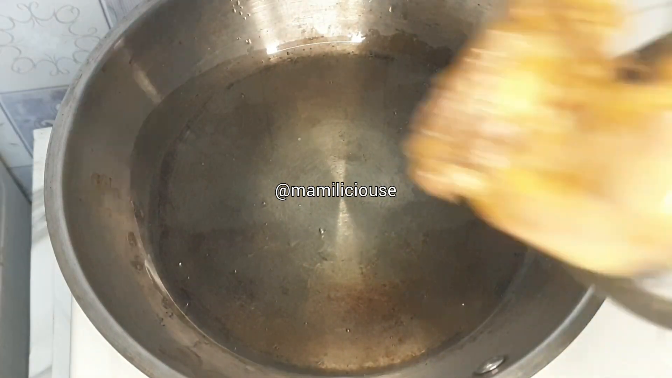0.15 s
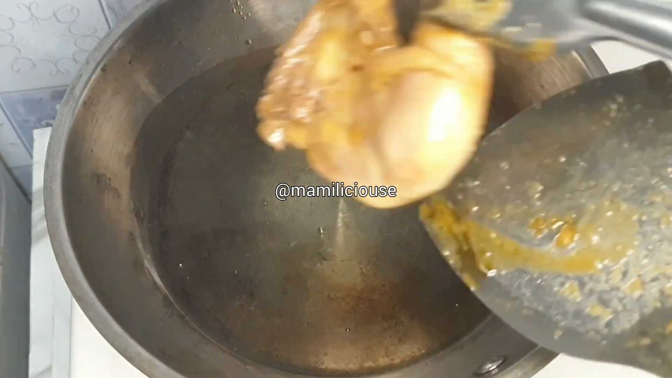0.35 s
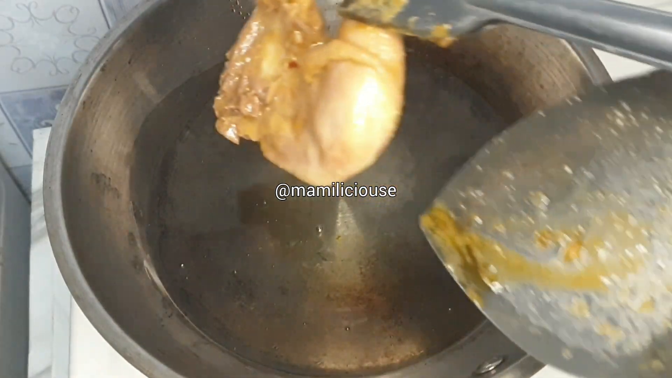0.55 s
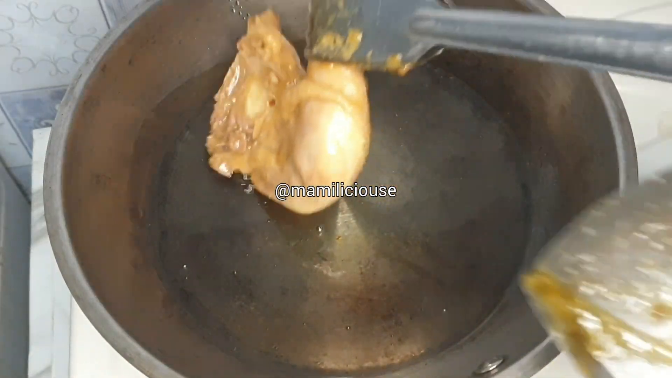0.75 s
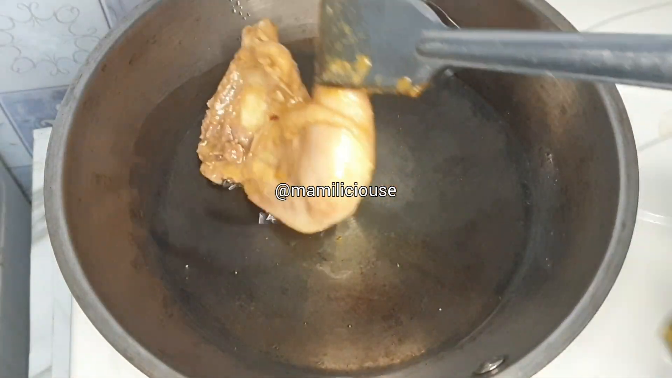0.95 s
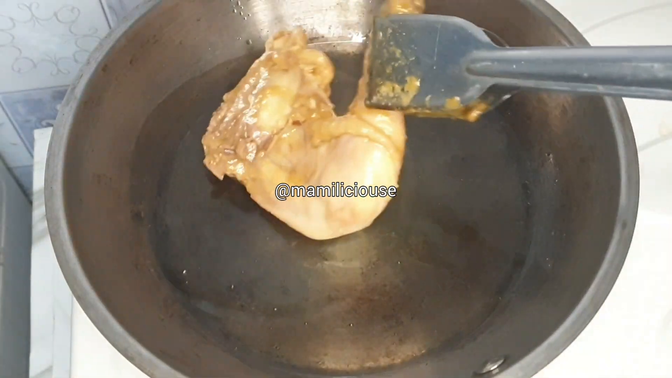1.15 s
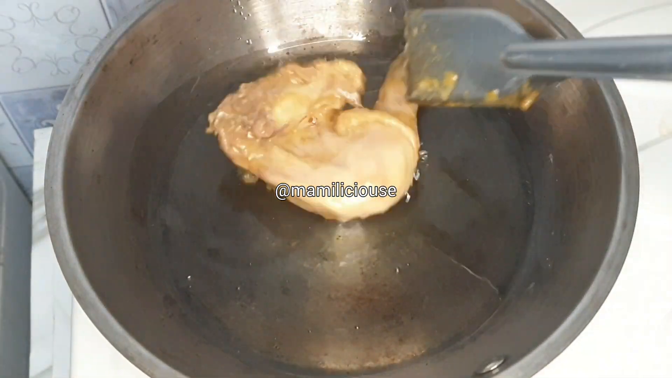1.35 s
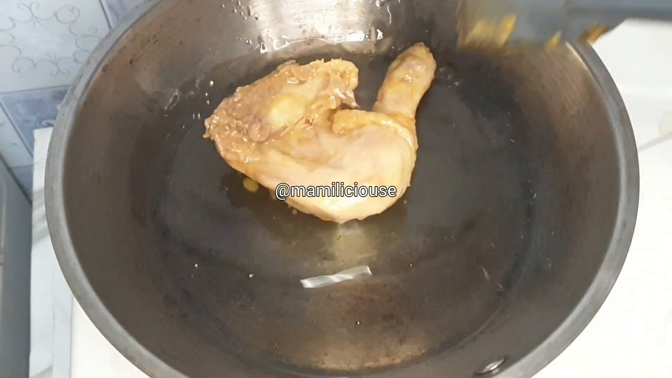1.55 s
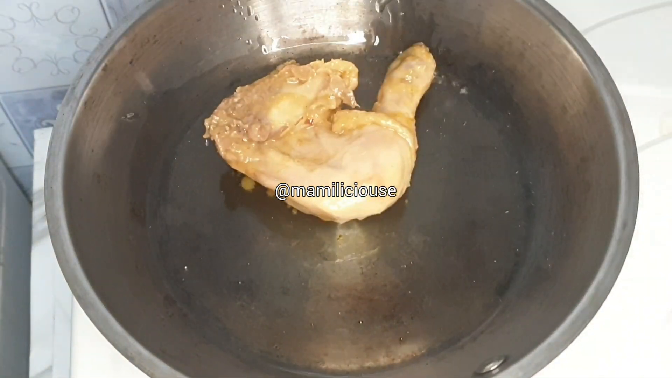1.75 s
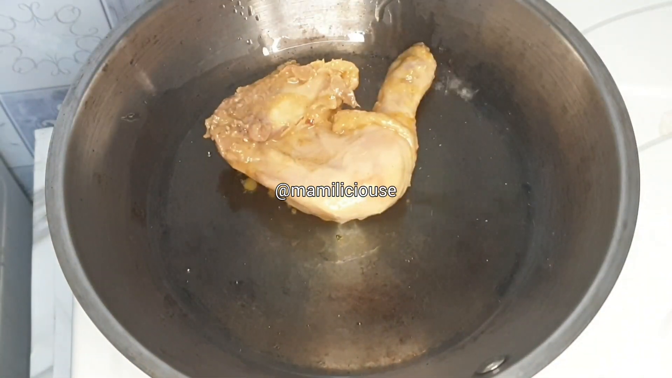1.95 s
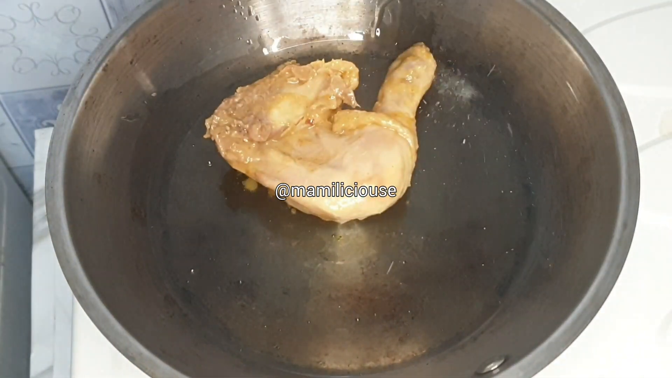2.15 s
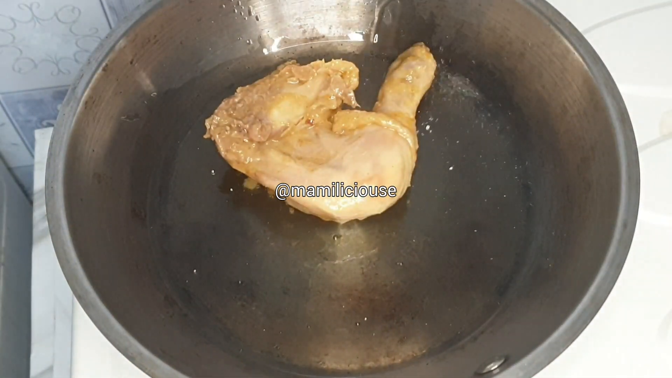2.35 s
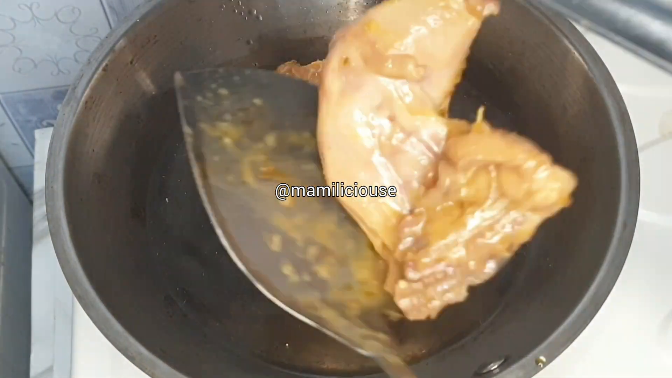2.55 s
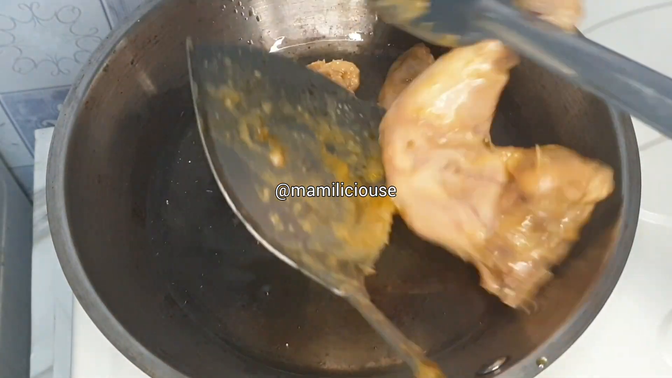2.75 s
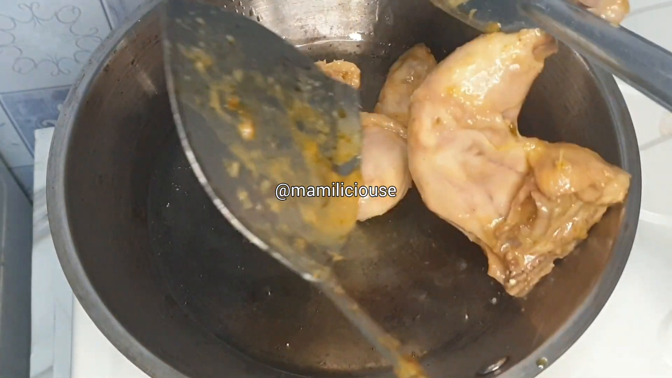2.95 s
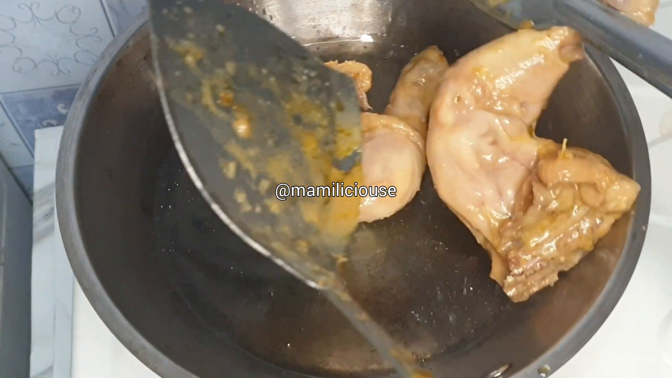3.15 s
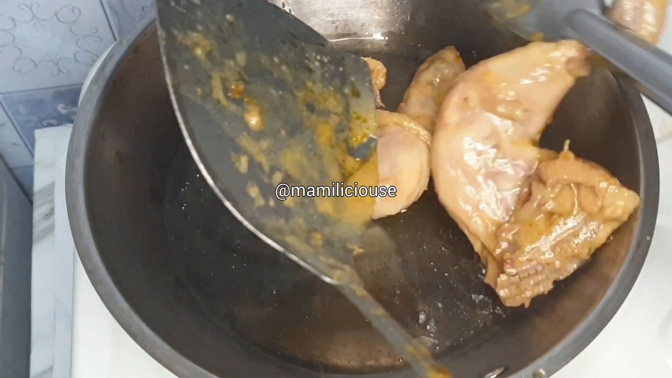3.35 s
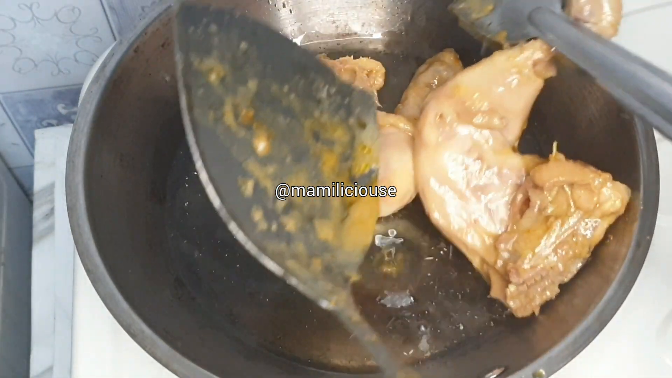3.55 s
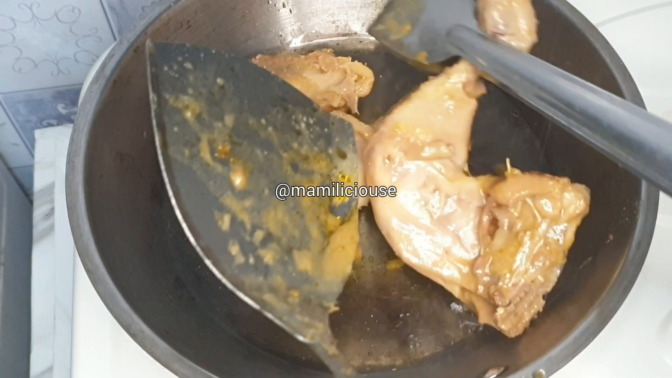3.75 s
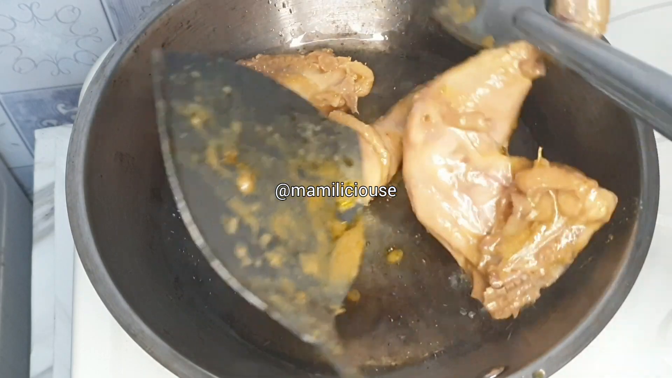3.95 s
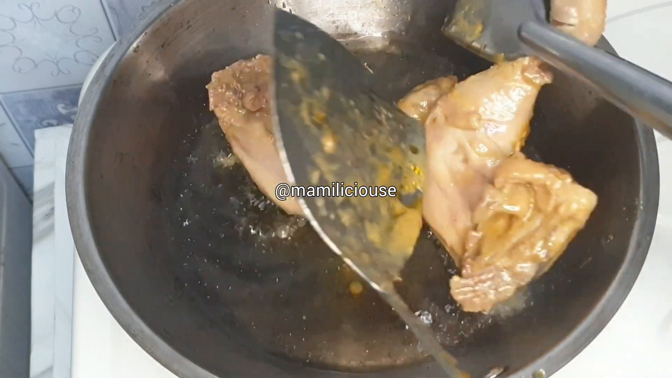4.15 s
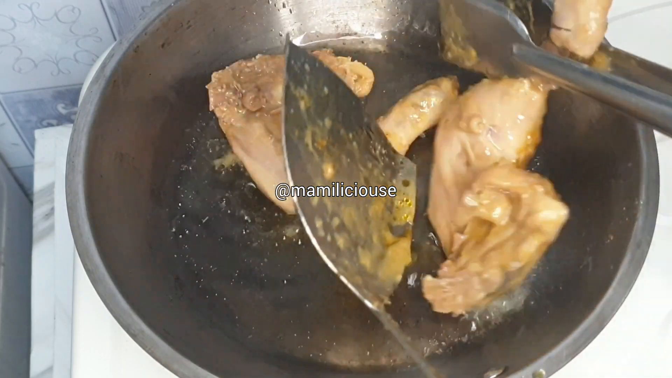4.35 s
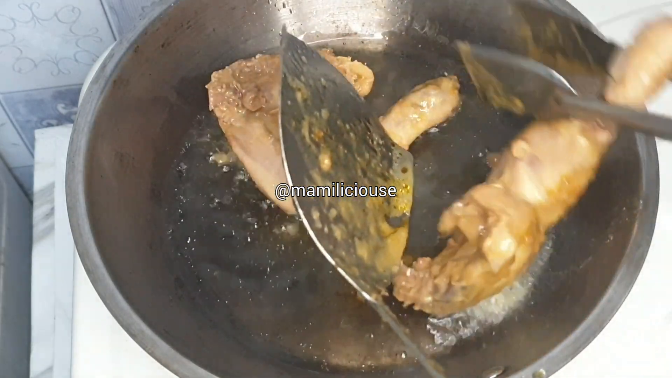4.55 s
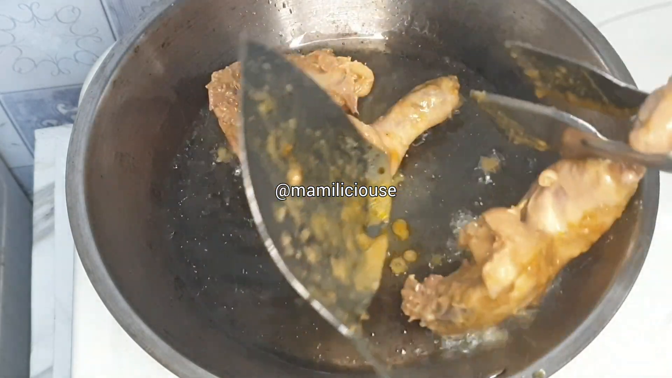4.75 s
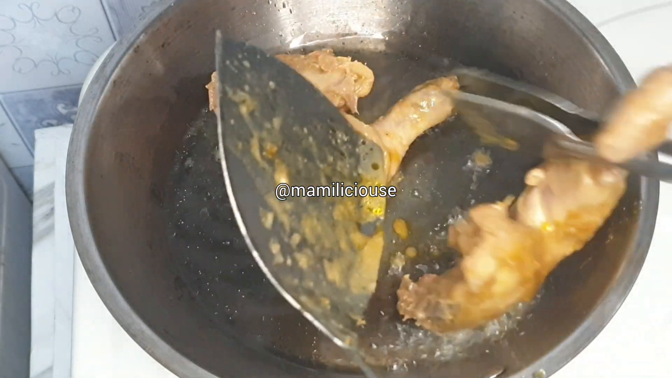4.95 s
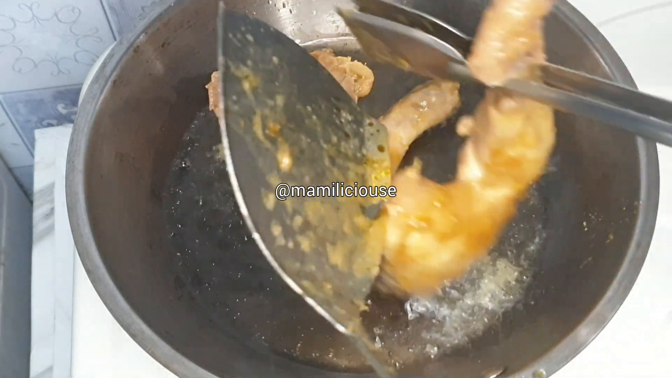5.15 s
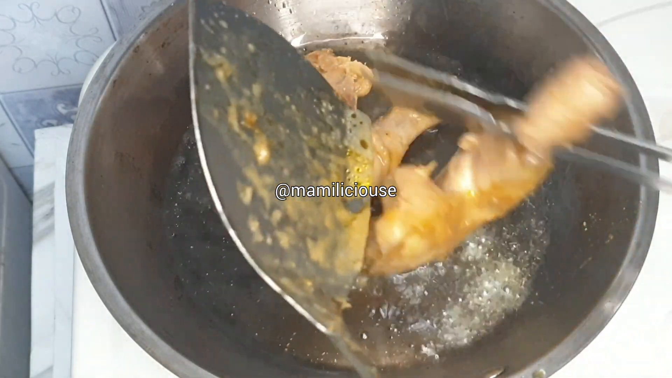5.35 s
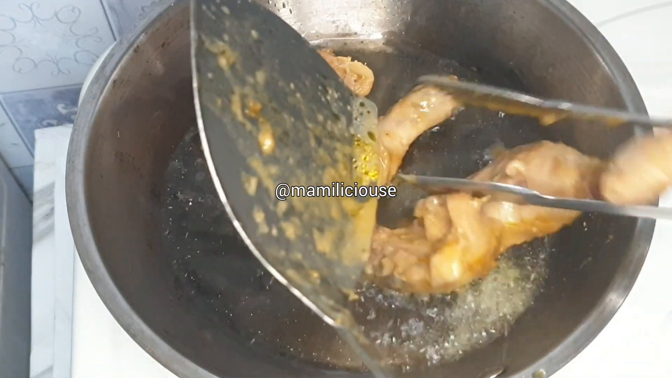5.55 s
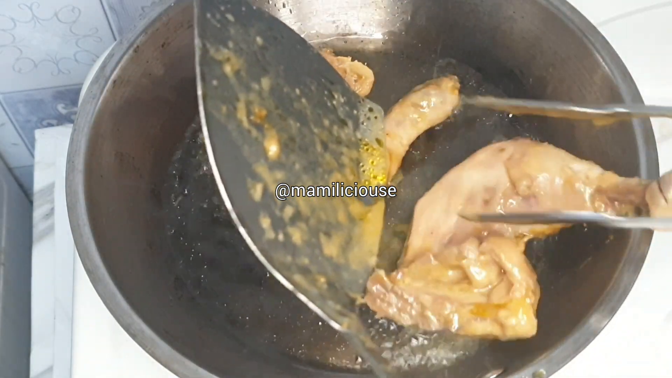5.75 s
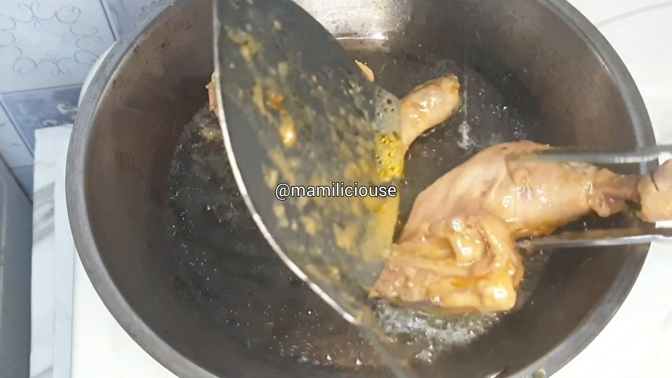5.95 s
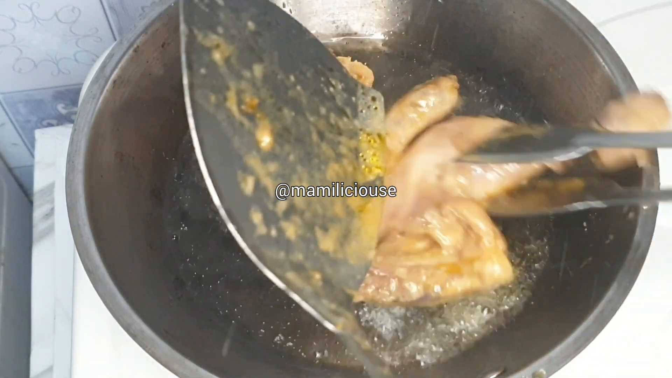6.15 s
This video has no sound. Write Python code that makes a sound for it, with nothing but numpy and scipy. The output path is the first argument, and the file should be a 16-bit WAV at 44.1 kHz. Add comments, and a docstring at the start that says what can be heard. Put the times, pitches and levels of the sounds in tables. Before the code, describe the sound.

A metal tick and a short steel scrape, then violent oil crackle with sharp pops, a tiny gap, and gentler, steadily growing frying.

```python
"""A spitting sizzle: chicken legs are lowered into hot oil, where steam bubbles of all sizes burst and ring.
After a short silence a second, calmer sizzle swells slowly. Both are crackle, droplet clicks and hiss.
Single larger bubbles pop on top. Tongs tick once and a turner scrapes, ringing the modes of the steel.
Dull bumps of the pot are low damped rings. A gas burner's roar and faint room hiss are coloured noise."""
import sys
import numpy as np
from scipy import signal
from scipy.fft import rfft, irfft, next_fast_len
from scipy.io import wavfile
from scipy.ndimage import uniform_filter1d

SR = 44100
rng = np.random.default_rng(int(sys.argv[2]) if len(sys.argv) > 2 else 0)


def master(y):
    """Save y as 16-bit WAV."""
    cut = np.clip(np.atleast_2d(y).T, -1, 1)
    pcm = np.round(cut * 32767)  # scale
    wavfile.write(sys.argv[1], SR, pcm.astype(np.int16))


def field_ratio(decibels):
    """Amplitude ratio for a level in dB (20 dB per decade); scalars and array-likes work."""
    return 10 ** (np.asarray(decibels, dtype=float) / 20)


N = 272979  # samples

SILENCE_S = 2.5065, 2.517  # the gap between the two pieces: start, end
LEFT_LEAD = 2  # samples, the pot sits nearer the left microphone


def evened(x):
    """Scales to rms 1."""
    return x / np.sqrt(np.mean(x ** 2) + 1e-20)


def read(points, hz):
    """Reads a curve of (Hz, value) points on a log-frequency axis."""
    f, value = np.transpose(points)
    return np.interp(np.log(hz + 1), np.log(f + 1), value)


def curve(rows):
    """Columns of a time table at every sample."""
    s, *columns = np.transpose(rows)
    t = np.arange(N) / SR
    return [np.interp(t, s, column) for column in columns]


def drift(per_s):
    """Slow random wander, drawn through per_s chance values a second."""
    knots = rng.standard_normal(int(N / SR * per_s) + 3)
    return np.interp(np.arange(N) / SR * per_s, np.arange(len(knots)), knots)


def shaped(x, gain):
    """Multiplies the spectrum by gain(hz)."""
    size = next_fast_len(N)
    return irfft(rfft(x, size) * gain(np.fft.rfftfreq(size, 1 / SR)), size)[..., :N]


def add(mix, s, sound, pan_db=2.):
    """Places a sound between the two microphones; the nearer one hears it louder and sooner."""
    for side, lean_db in zip(mix, (pan_db / 2, -pan_db / 2)):
        part = side[round(s * SR - lean_db):][:len(sound)]  # one sample sooner per dB louder
        part += field_ratio(lean_db) * sound[:len(part)]


# How alike left and right are. Each row: frequency in Hz, likeness from 0 to 1.
LIKENESS = [(25, .5), (60, 0.94), (150, 0.93), (400, 0.72), (1000, 0.46), (3000, 0.15), (6000, 0.22),
            (15000, 0.048)]


def paired(x):
    """Two microphones agree in the bass and part in the treble."""
    def same(hz):
        return np.clip(read(LIKENESS, hz), 0, 1)

    shared = shaped(np.roll(x[0], LEFT_LEAD), same)
    own = shaped(x[1], lambda hz: np.sqrt(1 - same(hz) ** 2))
    return np.array([x[0], shared + own])


def stereo_noise():
    """White noise heard by the two microphones."""
    return paired(rng.standard_normal((2, N)))


def echoes(x, t60, start_s):
    """Sparse fading reflections of random sign, other ones for each microphone; t60 in seconds."""
    taps = np.zeros((2, 8000))
    at = np.arange(0, 7980, 20) + rng.integers(0, 20, (2, 399))
    np.put_along_axis(taps, at, rng.choice([-1., 1.], at.shape), 1)
    t = np.arange(8000) / SR
    taps *= field_ratio(-60 * t / t60) * (t > start_s)
    return signal.oaconvolve(x, taps / np.linalg.norm(taps[0]), axes=1)[:, :N]


# Colour of the room hiss. Each row: frequency in Hz, relative level in dB per Hz.
AIR_COLOUR = [(880, -25), (1500, -7.0), (2670, -7.5), (5090, -11.0), (7520, -10.0), (8290, -19),
              (11400, -12), (15500, -11), (17000, -2)]


def air():
    """Faint steady hiss of the room: coloured noise."""
    hiss = evened(shaped(stereo_noise(), lambda hz: field_ratio(read(AIR_COLOUR, hz))))
    return field_ratio(-67.5) * hiss


# Colour of the flame and kitchen air. Each row: frequency in Hz, relative level in dB per Hz.
ROAR_COLOUR = [(15, -54), (25, -21.0), (93, -0.5), (152, -10.0), (297, -17.5), (359, -22.0), (495, -25.5),
               (567, -27), (684, -28.5), (1140, -37.0), (1380, -35.5), (3630, -54), (5140, -42),
               (8350, -67), (15500, -58), (17000, -60)]
# Fuzzy tones in the roar. Each row: frequency in Hz, width in Hz, height above the roar in dB.
DRONES = [(87.5, 3.1, 7), (299.5, 15, 5.5), (950, 120, 7), (1370, 50, 7), (2168, 60, 16.5)]


def burner():
    """Flame roar: low noise with faint drones and a lumpy flutter; from about 2 s the roar drops to a quieter
    steady level."""
    level_db, sink_from_s, sink_db, sink_time_s = -48, 1.99, -16., 0.77

    def colour(hz):
        drones_db = sum(db / (1 + (2 * (hz - f) / width) ** 2) for f, width, db in DRONES)
        return field_ratio(read(ROAR_COLOUR, hz) + drones_db)

    smooth = uniform_filter1d(uniform_filter1d(rng.standard_normal(N), 2000), 2000)
    flutter_db = evened(smooth)
    roar = evened(shaped(stereo_noise(), colour))
    since_s = np.maximum(np.arange(N) / SR - sink_from_s, 0)
    sinking_db = sink_db * (1 - np.exp(-since_s / sink_time_s))
    return roar * field_ratio(level_db + sinking_db + flutter_db) * field_ratio([[1.2], [-1.2]])  # leans left


# Dull bumps through pot and worktop. Each row: start in seconds, level in dB, pitch in Hz,
# spread of the pitch in Hz, time to fade by 60 dB in seconds.
BUMPS = [(0.08, -24.5, 52.6, 23, 0.18), (0.131, -34, 643, 1000, 0.016), (0.428, -33.5, 92, 23, 0.24),
         (1.386, -39.5, 335, 120, 0.36), (1.425, -24, 60.3, 26, 0.16), (2.772, -47.5, 330, 190, 0.45),
         (2.78, -45, 87.2, 69, 0.58), (3.104, -38, 123, 100, 0.11), (3.391, -44.5, 423, 380, 0.32),
         (3.42, -43.5, 100, 64, 0.4), (5.685, -40.5, 396.4, 180, 0.39), (5.697, -37.5, 83.4, 38, 0.32),
         (5.7, -45, 234, 140, 0.21), (5.719, -41, 153, 11, 0.52)]


def bumps():
    """Soft blows: a damped ring smeared over a band by rattling."""
    out, t = np.zeros((2, N)), np.arange(SR // 2) / SR
    for s, db, hz, spread_hz, t60 in BUMPS:
        a, b = rng.standard_normal((2, len(t)))
        r = np.exp(-np.pi * spread_hz / SR)
        rattle = signal.lfilter([1], [1, -2 * r, r * r], a + 1j * b)
        # only the phase of the rattle is used, so the fade stays smooth
        ring = (np.exp(2j * np.pi * hz * t) * rattle / abs(rattle)).imag
        soft_start = 1 - np.exp(-t * hz / 2.2)
        add(out, s, ring * field_ratio(db - 60 * t / t60) * soft_start, 2.5)
    return out


# Thin ringing modes of the tongs. Each row: frequency in Hz, relative level in dB,
# time to fade by 60 dB in seconds.
TONG_MODES = [(4240, -12, 0.65), (4380, -22, .3), (4624, -20, 0.65), (4700, -10, 0.43), (5220, -4, 0.16),
              (5350, -10, 0.18), (5830, 7, 0.15), (6200, -13.5, 0.25), (6450, -12, .3), (6870, -12, 0.21),
              (7110, -4, .25), (7634, 3, 0.13)]
# Colour of the tongs' dense ring. Each row: frequency in Hz, relative level in dB per Hz.
SHIMMER = [(880, -73), (1500, -40), (4020, -17), (4180, -15), (4990, -8), (5890, -4), (7020, 0.5),
           (7520, -19), (11100, -25), (13300, -15), (15500, -38), (17000, -18)]


def ticks():
    """Tongs tap steel once: a crack, a dense bright shimmer and thin modes."""
    s, db = 0.418, -29  # start in seconds, level that the parts below are set against
    dense, thin, t = np.zeros((2, N)), np.zeros((2, N)), np.arange(SR // 2) / SR
    ring = sum(field_ratio(d - 60 * t / t60) * np.sin(2 * np.pi * (hz * t + rng.random()))
               for hz, d, t60 in TONG_MODES)
    add(thin, s, field_ratio(db - 5.5) * ring / abs(ring).max(), 0.)
    noise = rng.standard_normal(len(t))
    crack, tail = field_ratio(10.5 - 60 * t / 0.013), field_ratio(-2.0 - 60 * t / 0.11)
    add(dense, s, field_ratio(db) * noise * (crack + tail), 0.)
    add(thin, s, field_ratio(db - 23.0 - 60 * t / 0.0055) * noise, 0.)  # the contact itself is wide
    dense = shaped(dense, lambda hz: field_ratio(read(SHIMMER, hz)))
    dense *= np.arange(N) >= s * SR  # nothing sounds before the tap
    return thin + dense + field_ratio(2.0) * echoes(dense, 0.3, 0.0023)


# Blade strokes on steel. Each row: start in seconds, relative level in dB, fade in dB per second,
# edge bite in dB added to the modes over 2 kHz.
STROKES = [(0.792, -38.5, 123, 1), (0.95, -43.5, 86, 2), (1.03, -43.5, 61, 4), (1.085, -43.5, 110, 3),
           (1.257, -47.5, 300, 2), (1.305, -49, 400, 4), (1.349, -46, 404, 4.5)]
# Ringing modes of the pot. Each row: frequency in Hz, width in Hz, relative level in dB.
POT_MODES = [(493, 30, -8.5), (802, 17, -6), (945, 38, -2.5), (1118, 34, -10.5), (1443, 37, -1),
             (1650, 21, -8), (2245, 25, -6), (2550, 49, -3), (2870, 50, -15), (3470, 38, -8),
             (4030, 46, -9), (4300, 55, -11), (4820, 65, 4), (6100, 74, -14), (6470, 73, -15),
             (7500, 76, -11)]


def scrape():
    """Stick-slip clicks under the blade ring the pot wall; each mode comes and goes as the blade moves."""
    slips_per_s, rise_s, lift_s = 1800, 0.017, 1.4  # the blade lifts off at lift_s
    t = np.arange(N) / SR
    strokes = np.array([np.clip((t - s) / rise_s, 0, 1) * field_ratio(db - fade * np.maximum(t - s, 0))
                        for s, db, fade, _ in STROKES])
    bite_db = np.array(STROKES)[strokes.argmax(0), -1]  # the loudest stroke decides
    clicks = (rng.random((2, N)) < slips_per_s / SR) * rng.standard_normal((2, N))
    slips = clicks * np.sqrt(SR / slips_per_s) * strokes.max(0) * (t < lift_s)
    span = 2 * SR  # covers all strokes and their ringing
    slips, out, t = slips[:, :span], np.zeros((2, N)), t[:4000]
    for hz, width, db in POT_MODES:
        ring = np.exp(-np.pi * width * t) * np.sin(2 * np.pi * hz * t)
        mode = field_ratio(db) * ring * np.sqrt(4 * np.pi * width / SR)
        drive = slips * field_ratio(4.5 * drift(25.) - 2. + bite_db * (hz > 2000))[:span]
        out[:, :span] += signal.oaconvolve(drive, mode[None], axes=1)[:, :span]
    out = shaped(out, lambda hz: 1 - 1 / (1 + (hz / 600) ** 4))  # the thick wall radiates little bass
    return paired(field_ratio(6.0) * out) * field_ratio([[1.2], [-1.2]])


# Vigour of the boiling, one list for each piece. Each row: time in seconds, sizzle level in dB.
FRYING = [
    [(0.78, -59), (0.797, -27.5), (0.87, -35.5), (0.94, -36.5), (0.96, -32.5), (1.1, -34.5), (1.17, -38.5),
     (1.38, -41.5), (1.392, -32.5), (1.45, -29), (1.5, -26), (1.56, -24), (1.635, -26.5), (1.86, -27),
     (1.935, -29), (2.02, -20), (2.18, -25.5), (2.32, -26.5), (2.39, -29), (2.506, -28)],
    [(2.517, -38.5), (2.6, -41), (2.77, -39), (3.025, -33), (3.15, -36), (3.4, -36.5), (3.65, -34.5),
     (3.775, -34.5), (4.05, -33), (4.3, -34), (4.525, -32), (5.025, -33.5), (5.275, -32.5), (6.19, -30)],
]


def vigour():
    """Sizzle level in dB at every sample."""
    return curve(FRYING[0] + FRYING[1])[0]


def lesser_pops(count=90):
    """Random pops of a dull and a bright family, riding on the sizzle level."""
    families_hz = (2300, 5120), (10000, 11000)  # lowest and highest pitch of each
    at, size, pitch, family, side = rng.random((count, 5)).T
    start_s = FRYING[0][1][0]
    s = start_s + at * (N / SR - start_s - .02)
    low, high = np.transpose(families_hz)[:, (family > .5).astype(int)]
    db = vigour()[(s * SR).astype(int)] + 4 + 3 * (2 * size - 1)  # 1 to 7 dB over the sizzle level
    pan_db = 4 + 5 * (4 * side - 2)
    return list(zip(s, db, low * (high / low) ** pitch, pan_db))


def bubble(hz, cycles, glide):
    """A burst cavity: quick rise, damped ring, pitch climbing as it opens."""
    u = np.arange(int(3 * cycles * SR / hz) + 8) * hz / SR  # time in cycles
    ring = np.sin(2 * np.pi * (u + glide * u ** 2 / cycles))
    return ring * np.exp(-2.3 * u / cycles) * (1 - np.exp(-1.1 * u))


# The loudest single bubbles. Each row: start in seconds, level in dB, pitch in Hz,
# left over right in dB.
POPS = [(0.9048, -19.5, 7500, -1), (0.9572, -20.5, 3430, 4.5), (1.0859, -17, 4800, 5),
        (1.281, -20, 4780, 10), (1.2864, -22, 4600, 2.5), (1.4646, -24, 2880, -5), (1.4925, -22, 4970, -2),
        (1.6931, -16.5, 4760, 3.0), (1.7689, -16, 3620, 0.5), (1.8432, -11, 6080, 2.5),
        (1.9041, -15.5, 5690, 0), (1.932, -19, 5800, -1.0), (1.9599, -27, 5980, -6), (1.9849, -19, 5230, 1),
        (2.0234, -17.5, 4120, -2), (2.0354, -10.5, 5100, -3.5), (2.0854, -15.5, 4560, 1),
        (2.1111, -14.5, 4980, 0.5), (2.142, -18, 5100, 2), (2.2004, -14, 3840, 2.5),
        (2.2584, -26, 1680, 2.5), (2.2797, -14.5, 3780, -0.5), (2.3186, -13, 5460, 1.5),
        (2.3334, -20.5, 1530, 5), (2.3516, -15, 3540, 3.5), (2.3574, -17, 5000, -0.5),
        (2.388, -15, 5760, -3), (2.3974, -15.5, 5080, -0.5), (2.4324, -31, 5080, -2),
        (2.4488, -12, 4930, 4), (2.4828, -16, 5050, 3.5), (2.5735, -28, 4790, 8),
        (2.6354, -22.5, 3900, 3.5), (2.6768, -21, 1690, -5.5), (2.7314, -23, 5100, 4),
        (2.7494, -26, 2590, -5), (2.7921, -26, 3650, 7), (2.8794, -22, 4600, 6), (3.0001, -23, 5290, 1.5),
        (3.0714, -22.5, 3860, 1.5), (3.1374, -33, 1560, 1.0), (3.2316, -20, 4900, 2),
        (3.2864, -25, 4990, 6.5), (3.3944, -26, 2520, 1), (3.4765, -20, 4270, 5.5),
        (3.4904, -23, 4950, 5.5), (4.1134, -18, 4170, 5.5), (4.5077, -25, 1860, 4),
        (4.6544, -23, 2270, 1.0), (5.2514, -20.5, 3830, 5), (5.7204, -19.5, 2760, 4),
        (5.9065, -20, 4030, 2.5), (6.0467, -21, 3050, 3), (1.2605, -36.5, 950, 4.5),
        (1.3094, -27.5, 2540, 5), (2.0557, -18, 2640, -2), (2.1844, -32, 2720, 10),
        (2.3226, -16.5, 2800, 3.5), (2.4964, -21, 3050, 2), (2.7237, -29, 2600, -5),
        (2.7427, -29, 2550, -3), (2.7614, -38, 2580, 6), (2.9996, -28, 2900, 4), (3.8811, -29, 2250, 7),
        (4.0696, -24, 3020, 7), (4.1679, -23, 3030, 2), (4.4852, -26, 2170, 1), (4.6464, -23, 2400, 4.5),
        (4.7895, -23.5, 2580, 3), (4.8264, -27, 2920, 1.5), (4.9422, -25, 2540, 0), (4.9911, -25, 3080, 3),
        (5.1876, -25, 2600, 11), (5.7389, -26, 3060, 1.5), (5.913, -25, 2970, 2.5),
        (5.9304, -23, 2590, 0.5), (1.1168, -22, 13100, 5), (1.3897, -15.5, 10100, 4),
        (1.4137, -15.5, 10000, -0.5), (1.5728, -8.5, 11400, 3), (1.6581, -21, 9390, -0.5),
        (1.6671, -11.5, 11200, 6), (1.693, -20, 9830, 5.5), (1.8098, -18, 12000, 2.0),
        (1.8676, -10, 11600, 2.5), (1.9604, -14, 11700, 3), (2.0078, -13, 11700, 3),
        (2.0258, -24, 12000, 6), (2.2044, -15, 11300, -4), (2.2393, -14, 11400, 4),
        (2.2742, -18, 12100, 3.5), (2.2932, -21, 11500, 1.0), (2.357, -23, 11600, -5),
        (2.3735, -11.5, 11600, 0), (2.3979, -21, 12200, -6), (2.4109, -10.5, 11600, 2),
        (2.4508, -20.5, 11700, 5), (2.8514, -19, 11700, 5), (3.475, -20, 10600, 2),
        (3.5997, -19, 11400, 6.5), (3.6351, -16, 11300, 6.5), (4.2881, -22, 12100, 10),
        (5.0519, -21, 10400, 1.5), (5.8406, -29, 11700, 4), (5.8591, -19.5, 11600, 7),
        (6.105, -18, 11600, 2.5)]
# How long a bubble rings. Each row: pitch in Hz, cycles until it has faded by about 20 dB.
RING_CYCLES = [(1500, 3), (2500, 3.7), (4800, 12.2), (6500, 4.5), (11500, 6.1)]


def pops():
    """Each large bubble rings at its pitch inside a short wet splash of noise."""
    rings, splashes, n = np.zeros((2, N)), np.zeros((2, N)), np.arange(300)
    swell = n / 20.0 * np.exp(1 - n / 32.2)
    for s, db, hz, pan_db in POPS + lesser_pops():
        ring = bubble(hz, np.clip(read(RING_CYCLES, hz), 1, 40), 0.0046)
        add(rings, s, field_ratio(db) * ring / ring.max(), pan_db)
        splash = rng.standard_normal(300) * swell
        add(splashes, s - .0005, field_ratio(db - 7.0) * splash, pan_db)
    out = rings + shaped(splashes, lambda hz: field_ratio(read(SPITTING_COLOUR, hz)))
    return out + field_ratio(-2.0) * echoes(out, 0.049, .001)


def burst_train(chance, spread_db):
    """Single-sample bursts at random moments, a few much stronger than the rest."""
    return (rng.random(N) < chance) * field_ratio(spread_db * np.minimum(rng.exponential(1, N), 4))


def crackle(per_s, spread_db, patchy_db, count=72):
    """Bubbles of every size burst in clumps; each size swells on its own and has its own side."""
    clumps, out, patch = drift(90.), np.zeros((2, N)), drift(9.)
    for hz in np.geomspace(700, 16500, count):
        cycles, glide, lag, side = rng.random(4)
        grain = bubble(hz, 1.22 + 14 * cycles ** 3 * min(hz / 3500, 6000 / hz, 1), 0.13 * glide)
        patch = .8 * patch + .6 * drift(9.)  # neighbouring sizes swell together
        rate = per_s / count * np.sqrt(hz / 3000) * field_ratio(3. * clumps + patchy_db * patch)
        train = burst_train(rate / SR, spread_db)
        sound = evened(signal.oaconvolve(train, grain)[:N]) * np.sqrt(hz)  # equal power per Hz
        left = sound * field_ratio(8.7 * side - 2.5)
        right = np.roll(sound, LEFT_LEAD + round(9 * lag - 4)) * field_ratio(2.5 - 5.5 * side)
        out += [left, right]
    return evened(out)


def spit(per_s, spread_db):
    """Droplets thrown out of the oil: wide clicks, each a puff of noise fading within a few ms."""
    train = burst_train(per_s / SR, spread_db)
    puff = signal.lfilter([1], [1, -np.exp(-1 / (SR * 0.00057))], train)
    return evened(paired(puff * rng.standard_normal((2, N))))


# Colour of the wetter first piece, also of the pops' splashes.
# Each row: frequency in Hz, relative level in dB per Hz.
SPITTING_COLOUR = [(240, -41), (400, -24), (543, -22.0), (726, -16.0), (1170, -15.5), (1540, -11),
                   (2360, -8.0), (2670, -6.5), (5000, 0), (7550, -4.0), (8400, -12), (11800, -4),
                   (15500, -13.5), (17000, -15.0)]
# Colour of the calm second piece. Each row: frequency in Hz, relative level in dB per Hz.
CALM_COLOUR = [(240, -32), (400, -24), (796, -13.0), (1120, -12.5), (1280, -13.5), (1540, -7), (1930, -7),
               (3010, -2.5), (3360, -3.0), (4220, 1), (6000, -2.0), (7600, -6.0), (8400, -12.0),
               (9500, -6.0), (10600, -6), (11700, -3.0), (13000, -8.5), (15500, -12.5), (17000, -30.0)]
# Sideways lean, one list for the calm and one for the spitting piece.
# Each row: frequency in Hz, left over right in dB.
LEAN = [(60, -7), (180, 7.5), (550, 1), (1650, 2), (4970, 1), (15000, 2.5)], [(60, 4), (180, 12),
        (550, 1.5), (1650, 3.0), (4970, -1), (15000, -2)]
# Spells of thinner or thicker spray. Each row: start in seconds, end in seconds, change in dB.
SPRAY_SPELLS = [(2.514, 2.786, -4.5), (3.56, 3.797, 1.5), (4.667, 5.05, 3)]


def sizzle():
    """Crackle, spit and steam hiss fill the pot; the first piece spits harder than the second."""
    level_db, t = vigour(), np.arange(N) / SR
    first = t < SILENCE_S[0]
    # a surge feeds the middle sizes most: big bubbles and fine spray follow it only in part
    plain_level_db = np.where(first, -29, -34)
    surge_db = np.clip(level_db - plain_level_db, -12, 12)
    # as the second piece heats, big bubbles gain and spray thins
    heating_s = (t - 4.4) * ~first
    big_db = 0.87 * heating_s - 0.4 * surge_db
    fine_db = np.where(first, 4, 0.5) - 1.1 * heating_s - 0.21 * surge_db
    fine_db = fine_db + sum(db * (t > start) * (t < end) for start, end, db in SPRAY_SPELLS)

    bursts = crackle(per_s=2500, spread_db=3.5, patchy_db=3.5)
    bursts = bursts + np.where(first, field_ratio(-3.5), field_ratio(-7.5)) * spit(per_s=500, spread_db=4.5)
    hiss = np.where(first, field_ratio(-3.5), field_ratio(1.5)) * stereo_noise()
    # bursts wander over the oil, so their echo pattern in the pot keeps changing
    spots = [np.sqrt(2 / 3) * np.cos(2 * np.pi * (1.7 * t + k / 3)) for k in range(3)]
    wet = sum(echoes(bursts * spot, 0.12, .001) for spot in spots)
    oil = bursts + field_ratio(-3.0) * paired(wet) + hiss

    wetter, calmer = (evened(shaped(oil, lambda hz: field_ratio(read(colour, hz))))
                      for colour in (SPITTING_COLOUR, CALM_COLOUR))
    oil = np.where(first, wetter, calmer)
    big = shaped(oil, lambda hz: 1 / (1 + (hz / 3500) ** 6))
    fine = shaped(oil, lambda hz: 1 - 1 / (1 + (hz / 8000) ** 8))
    oil = oil + (field_ratio(big_db) - 1) * big + (field_ratio(fine_db) - 1) * fine
    oil = field_ratio(level_db) * oil * (t > FRYING[0][0][0])
    # left takes 1.5 times the lean and right half of it, so they differ by the lean itself
    calm, spitting = ([shaped(oil[k], lambda hz: field_ratio((1.5 - k) * read(lean, hz))) for k in (0, 1)]
                      for lean in LEAN)
    return np.where(first, spitting, calm)


def scene():
    """All sources, with a short silence between the two pieces."""
    t = np.arange(N) / SR
    outside_s = np.maximum(SILENCE_S[0] - t, t - SILENCE_S[1])
    keep = np.clip(outside_s / 0.0011 + .5, 0, 1)
    return keep * (sizzle() + pops() + scrape() + ticks() + bumps() + burner() + air())


def top_cut(x):
    """Nothing passes above the cut-off."""
    return signal.sosfilt(signal.butter(12, 16810, fs=SR, output="sos"), x)


def record(dry):
    """A phone's band limit: the treble drops just below 15750 Hz to a faint remainder."""
    limited = shaped(dry, lambda hz: np.clip((15750 - hz) / 200, 0, 1) + field_ratio(-34.5))
    return top_cut(limited)


dry = scene()
out = record(dry)
master(out)
```